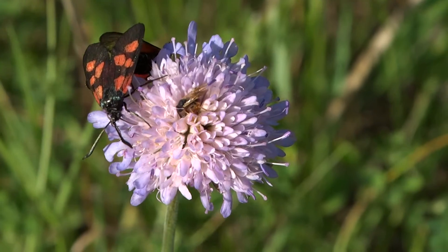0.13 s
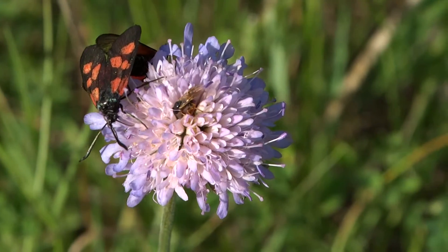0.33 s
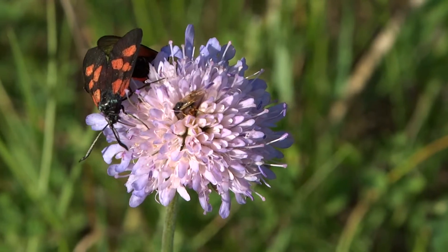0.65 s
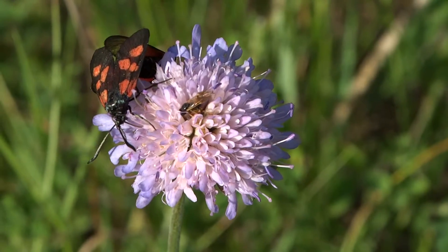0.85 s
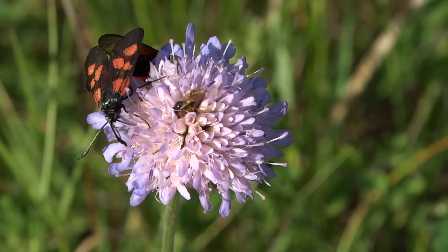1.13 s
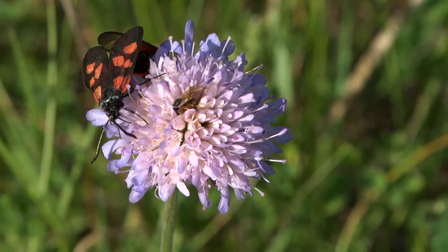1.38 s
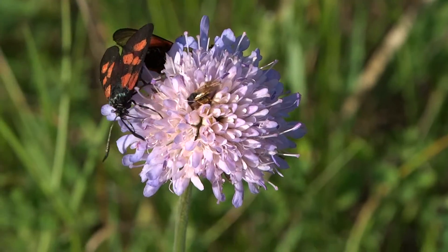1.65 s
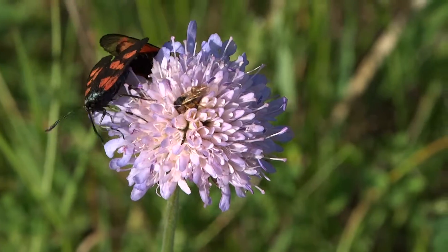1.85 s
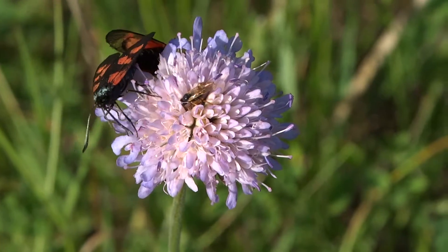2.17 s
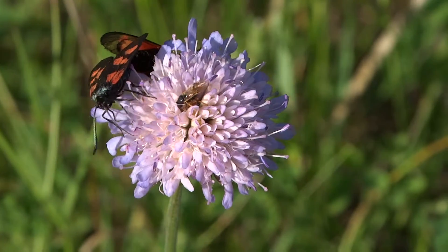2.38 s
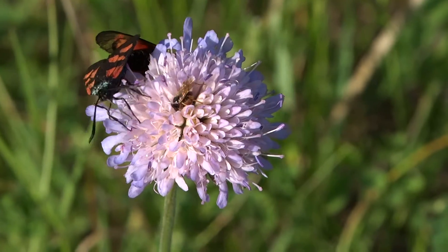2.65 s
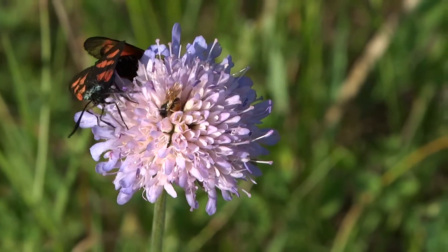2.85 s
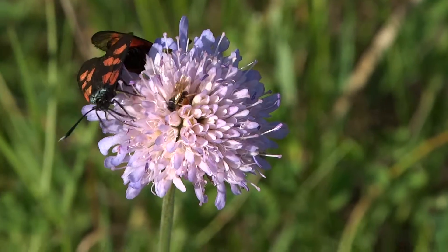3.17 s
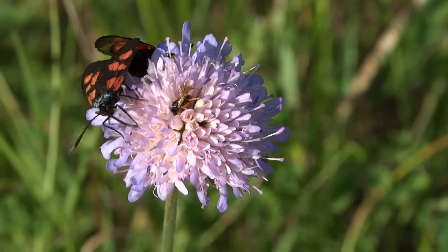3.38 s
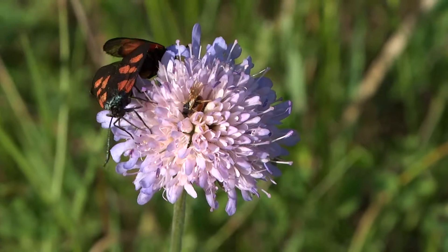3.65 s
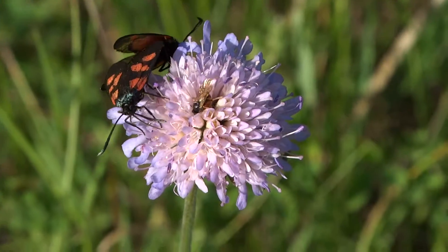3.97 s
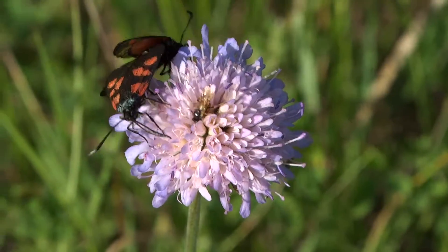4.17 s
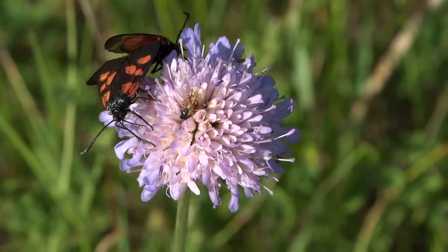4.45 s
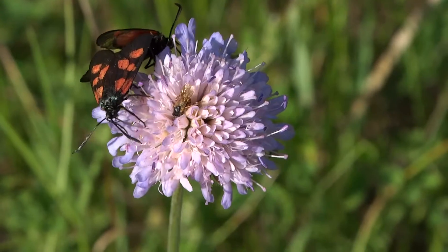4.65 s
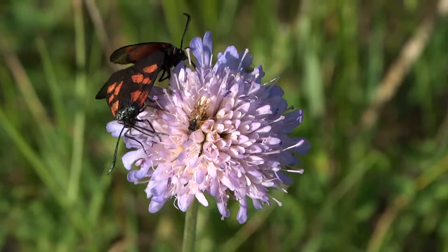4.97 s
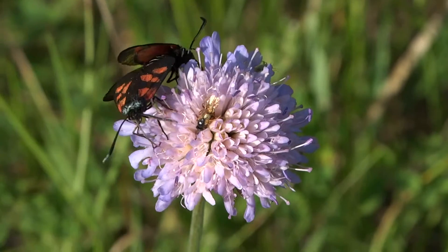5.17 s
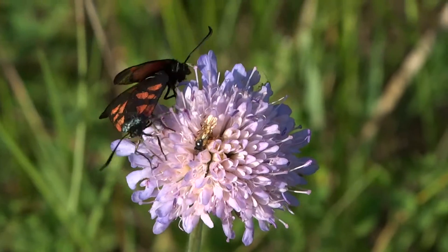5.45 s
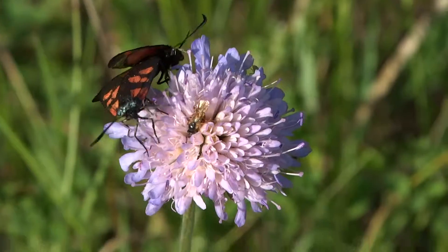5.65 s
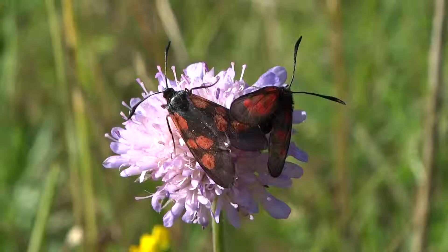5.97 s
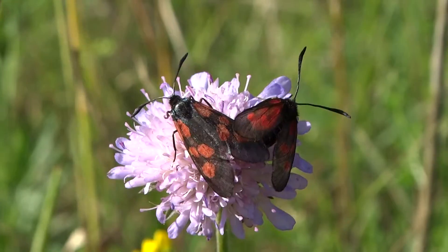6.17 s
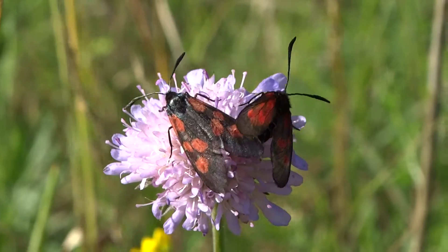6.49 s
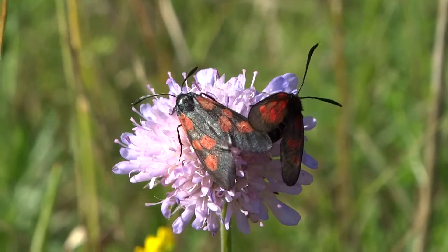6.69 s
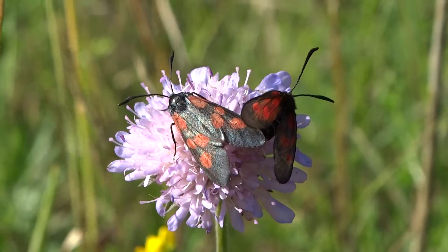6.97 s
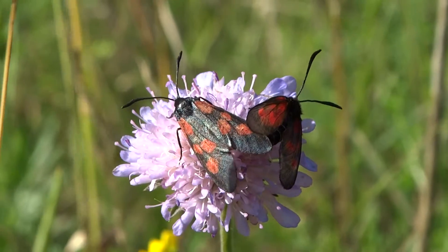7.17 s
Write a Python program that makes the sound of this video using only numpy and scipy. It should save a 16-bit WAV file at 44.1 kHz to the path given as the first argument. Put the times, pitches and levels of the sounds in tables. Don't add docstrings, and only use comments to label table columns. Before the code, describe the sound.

Quiet meadow grass buzzes with insects: close rasping chirps in rhythmic runs, one deeper and one shriller and softer, over a fine shimmering hiss and distant traffic wash. The hand-held microphone picks up small plastic ticks, a brief finger rub and hard clicks. Two thin bird seeps and a barely audible fly hum pass midway. After a short fade at the end, only even insect hiss and slightly fuller road noise remain.

```python
import sys
import numpy as np
from scipy import signal
from scipy.fft import rfft, irfft, next_fast_len
from scipy.io import wavfile

SR = 44100
rng = np.random.default_rng(int(sys.argv[2]) if len(sys.argv) > 2 else 0)


def log_audio(samples):
    frames = np.atleast_2d(samples).T
    limited = np.clip(frames, -1, 1)
    pcm = np.round(limited * 32767).astype(np.int16)
    wavfile.write(sys.argv[1], SR, pcm)


def gain_from_db(level_db):
    decades = np.asarray(level_db, float) / 20
    return 10 ** decades


N = 323253
CUT_S = 5.997

# (frequency [Hz], side over mid [dB])
PORT_SPREAD = [(100, -2), (700, -5), (1500, -10), (3000, -17), (4500, -17.5), (6500, -32.5), (8300, -30),
               (9300, -14.5), (10500, -5), (12000, -10.5), (13500, -16.5), (15000, -19)]


def in_time(rows):
    s, *columns = np.transpose(rows)
    return [np.interp(np.arange(N) / SR, s, c) for c in columns]


def at_hz(points, hz):
    point_hz, point_db = np.transpose(points)
    return np.interp(np.log(hz + 1), np.log(point_hz), point_db)


def rms_one(x):
    return x / np.sqrt(np.mean(x ** 2) + 1e-20)


def drift(rate):
    r = np.exp(-40 * np.pi * rate / SR)
    chance = rng.standard_normal(N // 20 + 2002)
    slow = signal.lfilter([1], [1, -2 * r, r * r], chance)[2000:]
    return np.interp(np.arange(N) / 20, np.arange(len(slow)), rms_one(slow))


def highpass(x, order, hz):
    return signal.sosfilt(signal.butter(order, hz, "high", fs=SR, output="sos"), x)


def ring(x, hz, t60):
    r = gain_from_db(-60 / (t60 * SR))
    w = 2 * np.pi * hz / SR
    return signal.lfilter([.5, 0, -.5], [1, -2 * r * np.cos(w), r * r], x + 1e-18)


def ports(mid, other, spread=PORT_SPREAD):
    size = next_fast_len(N)
    width_gain = gain_from_db(at_hz(spread, np.fft.rfftfreq(size, 1 / SR)))
    side = irfft(rfft(other, size) * width_gain, size)[:N]
    return np.array([mid + side, mid - side])


def meadow(road, chorus, levels_db, spread, patchy_db, throb_db):
    size = next_fast_len(N)
    hz = np.fft.rfftfreq(size, 1 / SR)
    groups = np.zeros((3, 2, N))
    throb = drift(90) + 0.23 * drift(3.1)
    road_centres = 16 * 2 ** np.arange(0, 9.5, .5)
    chorus_centres = 2800 * 2 ** np.arange(0, 3.5, .5)
    for insects, spectrum, centres in ((0, road, road_centres), (1, chorus, chorus_centres)):
        white = rfft(rng.standard_normal((2, size))) * gain_from_db(at_hz(spectrum, hz))
        for centre in centres:
            shrill = centre > 10000
            share = np.cos(np.pi * np.clip(np.log2((hz + 1) / centre), -.5, .5)) ** 2
            gain = gain_from_db(patchy_db * drift(6.1) + throb_db * throb * insects)
            if shrill:
                gain = gain ** 1.8
            groups[insects + int(shrill)] += gain * irfft(white * share, size)[:, :N]
    mid, other = sum(gain_from_db(db) * rms_one(g) for db, g in zip(levels_db, groups))
    return ports(mid, other, spread)


def first_spot():
    # (frequency [Hz], level per Hz [dB])
    road = [(12, -72), (20, -29), (108, -31), (335, -25), (452, -19), (544, -19.5), (597, -19),
            (844, -15.5), (1250, -10), (1370, -8.5), (1540, -7.5), (1890, -7), (3300, 0), (4560, -6.5),
            (5000, -8.5), (6500, -23.5), (11000, -120)]
    # (frequency [Hz], level per Hz [dB])
    chorus = [(2710, -39), (4600, -17.5), (5800, -9.5), (6870, -3), (7570, -4), (8520, -4.5), (11000, -14),
              (12300, -16.5), (15100, -20.5), (15700, -30.5)]
    # (time [s], level [dB])
    deep_choir = [(0.0, -49.5), (0.33, -50), (1.03, -47.5), (1.5, -48.5), (2.0, -49), (2.6, -50),
                  (3.4, -49), (4.5, -50.5), (5.0, -49), (5.5, -51), (5.95, -49.5)]
    # (time [s], level [dB])
    shrill_choir = [(0.0, -64), (0.33, -66), (1.03, -59.5), (1.9, -61.5), (2.5, -63), (2.84, -65),
                    (3.29, -61), (3.6, -64.5), (4.9, -62.5), (5.45, -60.5), (5.95, -61)]
    road_db = -59 + 0.2564 * np.arange(N) / SR
    levels_db = [road_db, *in_time(deep_choir), *in_time(shrill_choir)]
    return meadow(road, chorus, levels_db, PORT_SPREAD, patchy_db=0.62, throb_db=0.84)


def strokes_of(phrases, length):
    strokes = []
    for first, last, count, first_db, last_db in phrases:
        times = np.linspace(first, last, round(count))
        levels = np.linspace(first_db, last_db, round(count))
        strokes += [(s, db, length) for s, db in zip(times, levels)]
    return strokes


def singer(strokes, wing, teeth_per_s, jerks_per_s, jerk_db, rise, fall, level_db):
    t, swell = np.arange(N) / SR, np.zeros(N)
    for s, db, length in strokes:
        near = slice(max(round((s - 4 * length) * SR), 0), round((s + 2 * length) * SR))
        late = (t[near] - s) / length - .1
        swell[near] += gain_from_db(db) * np.exp(-(late / np.where(late < 0, rise, fall)) ** 2)
    jerk_turns = np.cumsum(jerks_per_s * (1 + .15 * drift(15.3))) / SR
    jerks = gain_from_db(jerk_db * (np.sin(2 * np.pi * jerk_turns) - 0.36))
    hits = rng.random((2, N)) < teeth_per_s / SR
    force = gain_from_db(2.2 * np.minimum(rng.exponential(1, (2, N)), 3))
    teeth = hits * force * rng.choice([-1, 1], (2, N))
    rasp = np.zeros((2, N))
    for k, (hz, width, db) in enumerate(wing):
        rasp += (-1) ** k * gain_from_db(db) * np.sqrt(width) * ring(teeth, hz, 1.7 / width)
    rasp = highpass(rasp, 4, 5200)
    return ports(*(gain_from_db(level_db) * swell * jerks * rms_one(rasp)))


def deep_singer():
    # (first [s], last [s], strokes [count], first level [dB], last level [dB])
    phrases = [
        (0.047, 0.96, 8, -55.5, -53),
        (1.235, 1.333, 2, -57, -54),
        (1.4, 2.314, 8, -51, -51.5),
        (2.684, 2.813, 2, -54, -56),
        (3.8, 3.914, 2, -57, -55.5),
        (4.345, 4.61, 3, -52, -53.5),
        (5.057, 5.312, 3, -54, -56),
        (5.574, 5.94, 4, -54, -51),
    ]
    # (time [s], level [dB], length [s])
    strays = [
        (2.99, -60, 0.043),
        (3.239, -56, 0.019),
        (3.457, -56, 0.026),
        (3.637, -60, 0.12),
        (4.09, -55, 0.034),
        (5.392, -53, 0.021),
    ]
    # (frequency [Hz], width [Hz], level [dB])
    wing = [(6630, 1400, -3), (7420, 550, 2), (8400, 710, -1), (9670, 1600, -12)]
    strokes = strokes_of(phrases, length=0.051) + strays
    return singer(strokes, wing, teeth_per_s=7700, jerks_per_s=110, jerk_db=7.0,
                  rise=0.73, fall=0.35, level_db=3.0)


def shrill_singer():
    # (first [s], last [s], strokes [count], first level [dB], last level [dB])
    phrases = [(0.055, 0.421, 4, -70, -63), (0.545, 0.998, 5, -63, -64), (1.095, 1.336, 3, -63, -62),
               (1.429, 1.528, 2, -62, -64), (1.669, 2.19, 5, -60.5, -59.5), (2.366, 2.671, 3, -64, -63),
               (2.875, 3.001, 2, -63, -64), (3.239, 3.36, 2, -64, -62.5), (3.647, 3.78, 2, -67, -63),
               (4.102, 4.179, 2, -67, -71), (4.528, 4.607, 2, -63, -67), (5.589, 5.928, 4, -63, -63)]
    # (time [s], level [dB], length [s])
    strays = [
        (3.462, -59, 0.027),
        (5.059, -64, 0.043),
        (5.384, -66, 0.079),
    ]
    # (frequency [Hz], width [Hz], level [dB])
    wing = [(9000, 1500, 5), (10540, 600, 3), (11900, 1200, -0.5), (13700, 1500, -4), (14800, 1000, -6)]
    strokes = strokes_of(phrases, length=.048) + strays
    return singer(strokes, wing, teeth_per_s=7000, jerks_per_s=110, jerk_db=6.0,
                  rise=0.6, fall=0.22, level_db=6.5)


def shell_tick(modes, db, peak_hz, treble_db, bass_db):
    span, step = round(.06 * SR), np.arange(200) / SR
    lasts = 0.00034 * gain_from_db(0.23 * (db + 32.0))
    common, differing = rng.standard_normal((2, 200))
    chatter = np.zeros((2, span))
    chatter[:, :200] = (common + 0.27 * differing * np.array([[1], [-1]])) * step * np.exp(-step / lasts)
    zones = np.zeros((3, 2, span))
    for (hz, mode_db, t60), odd in zip(modes, rng.standard_normal(len(modes))):
        zone = int(hz > 1100) + int(hz > 4500)
        struck = ring(chatter, hz, t60)
        favour_db = -7 * np.log2(hz / peak_hz) ** 2 * (zone == 1)
        favour_db += 0.34 * (db + 16) * max(np.log2(hz / 9000), 0)
        zones[zone] += gain_from_db(mode_db + favour_db + odd) * struck / np.abs(struck).max() * np.sign(odd)
    zones[1:] = highpass(zones[1:], 3, 1000)
    zones[2] = 0.33 * zones[2] + 0.64 * zones[2].mean(axis=0)
    bass, middle, treble = zones / np.abs(zones).max(axis=(1, 2), keepdims=True)
    pan_db = -2 * np.array([[.5], [-.5]])
    return gain_from_db(db + pan_db) * (middle + gain_from_db(treble_db) * treble + gain_from_db(bass_db) * bass)


def shell():
    # (time [s], peak level [dB], strongest pitch [Hz], treble [dB], bass [dB])
    ticks = [
        (1.4931, -35, 1910, 3.5, -9.5),
        (2.559, -46, 1590, 2, -12),
        (3.201, -31, 1790, 2, -32),
        (3.206, -44, 1730, 12, -26),
        (3.222, -38, 2800, -12, -17),
        (3.238, -35.5, 1700, -0.5, -20),
        (4.143, -21, 3380, -8, -24.5),
        (5.3593, -34, 2300, 4.5, -13.5),
        (5.460, -26, 2400, -9, -15),
        (5.532, -14.5, 3080, 4, -19),
    ]
    # (frequency [Hz], level [dB], t60 [s])
    modes = [(533, -6, 0.013), (744, -8.5, 0.02), (1040, 1, 0.038), (1504, 1, 0.019), (1796, 1.5, 0.016),
             (2047, -3, 0.028), (2400, -3, 0.016), (2800, -0.5, 0.018), (3260, -2, 0.014),
             (3770, 5.5, 0.0049), (4900, -5, 0.0091), (6700, -22.5, 0.0067), (6620, 8, 0.0069),
             (7700, -2, 0.0036), (8600, 3, 0.005), (9600, -1.5, 0.0046), (11000, -7, 0.0044),
             (12400, -13, 0.0031), (14100, -23, 0.0026), (15400, -27, .003)]
    # (time [s], frequency [Hz], level [dB], t60 [s])
    hollow = [
        (4.144, 570, -56.5, 0.058),
        (5.462, 940, -53.5, 0.12),
        (5.533, 750, -41.5, 0.037),
        (5.535, 1088, -49.5, 0.15),
        (5.535, 1714, -45.5, 0.06),
        (5.536, 1136, -54, 0.07),
    ]
    # (time [s], frequency [Hz], level [dB], t60 [s])
    pings = [
        (1.494, 1850, -42, .012),
        (1.494, 2800, -44, .01),
        (3.2015, 1600, -41, .015),
        (3.2015, 5000, -40, .008),
        (4.144, 3900, -30, .012),
        (4.144, 4900, -37, .008),
        (5.3595, 850, -47, .02),
        (5.3595, 2700, -42, .01),
        (5.4605, 2500, -33, .013),
        (5.533, 1550, -30, .012),
    ]
    out = np.zeros((2, N))
    for s, *character in ticks:
        tick = shell_tick(modes, *character)
        at = round(s * SR)
        out[:, at:at + tick.shape[1]] += tick
    for s, hz, db, t60 in hollow + pings:
        click = 1.0 * (np.arange(N) == round(s * SR))
        out += gain_from_db(db) * ring(click, hz, t60) * [[1.4], [.6]]
    out += gain_from_db(-17.0) * np.roll(out, round(.0048 * SR), axis=1)
    out = highpass(out, 3, 520)
    return signal.sosfilt(signal.butter(6, 15300, fs=SR, output="sos"), out)


def scuff(rows):
    hz, db = in_time(rows)
    t = np.arange(N) / SR
    touching = (t > rows[0][0]) * (t < rows[-1][0])
    grains = rng.standard_normal(N) * gain_from_db(2.5 * drift(300)) * touching
    rub = np.zeros(N)
    for mode in (300, 420, 600, 850, 1200, 2100, 3300):
        colour = gain_from_db(db - 11.0 * np.log2(hz / mode) ** 2)
        rub += colour * ring(grains, mode, 10.0 / mode) * np.sqrt(mode / SR)
    return highpass(rub, 2, 160)


def finger_scuffs():
    # (time [s], pitch [Hz], level [dB])
    scuffs = [
        [(3.151, 1500, -63), (3.154, 1300, -59), (3.158, 1100, -62), (3.163, 900, -80)],
        [(4.174, 2400, -72), (4.182, 2300, -46), (4.186, 1600, -55), (4.192, 900, -53.5), (4.203, 700, -60),
         (4.21, 650, -67)],
    ]
    return sum(scuff(rows) for rows in scuffs)


def tone(rows, wobble_db, waver):
    hz, db = in_time(rows)
    t = np.arange(N) / SR
    edge = np.clip(np.minimum(t - rows[0][0], rows[-1][0] - t) / 0.006, 0, 1)
    turns = np.cumsum(hz * (1 + waver * drift(28.4))) / SR
    return np.sqrt(2) * gain_from_db(db + wobble_db * drift(40)) * edge * np.sin(2 * np.pi * turns)


def fly():
    # (start [s], end [s], wing tone [Hz], nearest level [dB])
    passes = [
        (3.35, 3.95, 460, -90),
        (4.6, 5.3, 462, -89),
    ]
    far_db = -2.0
    hum = np.zeros(N)
    for start, end, hz, db in passes:
        rows = [(start, hz, db + far_db), ((start + end) / 2, hz, db), (end, hz, db + far_db)]
        hum += tone(rows, wobble_db=2.5, waver=0.09)
    return hum


def bird():
    # (time [s], pitch [Hz], level [dB])
    seeps = [
        [(3.57, 6900, -64), (3.582, 7050, -58), (3.597, 7300, -51), (3.612, 7350, -60), (3.622, 7100, -54),
         (3.637, 6700, -51), (3.657, 6250, -56)],
        [(4.81, 6500, -64), (4.83, 6750, -57), (4.855, 6800, -54), (4.875, 7200, -58), (4.889, 7700, -53),
         (4.906, 7100, -48), (4.925, 6750, -47), (4.953, 6200, -53)],
    ]
    call = sum(tone(rows, wobble_db=.8, waver=.002) for rows in seeps)
    echo = gain_from_db(-4.0) * np.roll(call, round(.015 * SR))
    return call * gain_from_db([[-.7], [.7]]) + echo * gain_from_db([[.8], [-.8]])


def second_spot():
    # (frequency [Hz], level per Hz [dB])
    road = [(12, -66), (20, -39), (80, -37), (146, -32), (224, -31), (410, -19.5), (524, -18.5), (1030, -9),
            (1250, -9), (1470, -4), (1920, -3), (2200, -7), (2510, -1.5), (3670, -5), (4200, -7),
            (5460, -21), (9240, -120)]
    # (frequency [Hz], level per Hz [dB])
    chorus = [(2290, -38), (3900, -16.5), (6470, -7), (8030, -9), (8720, -11), (11100, -25), (11400, -28.5),
              (13000, -34), (14100, -33), (15700, -38)]
    # (frequency [Hz], side over mid [dB])
    spread = [(100, -4), (700, -8.5), (1500, -13), (3400, -14.5), (4500, -19.5), (6500, -24), (8300, -23.5),
              (9300, -15), (10500, -5.5), (12000, -6), (15000, -18)]
    levels_db = [-57, -51, -67.1]
    return meadow(road, chorus, levels_db, spread, patchy_db=0.5, throb_db=0.87)


def fade():
    out_s, in_s, swell_s = 0.034, 0.022, 0.23
    after = np.arange(N) / SR - CUT_S
    open_part = np.clip(np.where(after < 0, -after / out_s, after / in_s), 0, 1)
    dip = np.sin(np.pi / 2 * open_part) ** 6.5
    return dip * np.where(after < 0, 1, np.clip(after / swell_s, 0, 1) ** 0.5)


def scene():
    first = first_spot() + deep_singer() + shrill_singer() + fly() + bird()
    air = np.where(np.arange(N) < CUT_S * SR, first, second_spot())
    air = signal.sosfilt(signal.ellip(10, .5, 70, 15780, fs=SR, output="sos"), air)
    return air + shell() + finger_scuffs()


def band_limit(x):
    return signal.sosfilt(signal.butter(12, 16510, fs=SR, output="sos"), x)


def record(dry):
    hiss = gain_from_db(-105) * rng.standard_normal(dry.shape)
    mix = (dry + hiss) * fade()
    return band_limit(mix)


dry = scene()
out = record(dry)
log_audio(out)
```